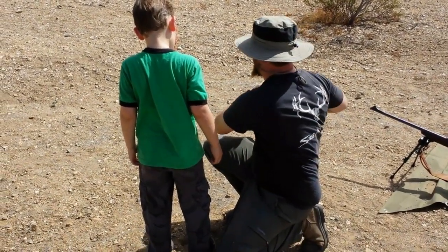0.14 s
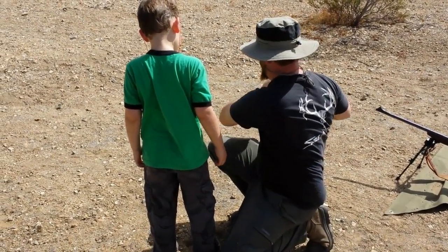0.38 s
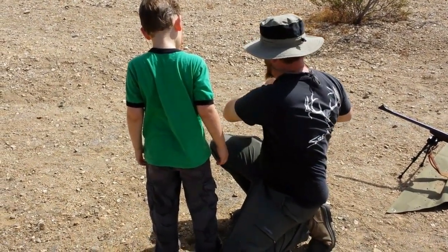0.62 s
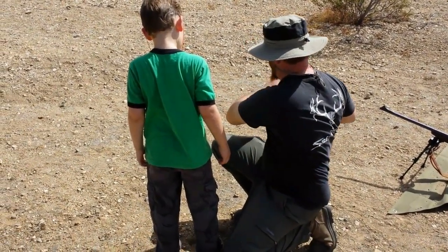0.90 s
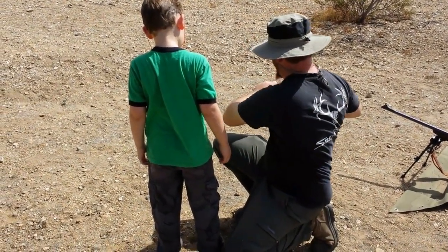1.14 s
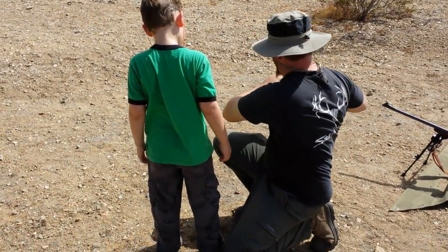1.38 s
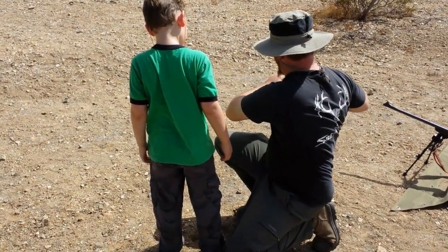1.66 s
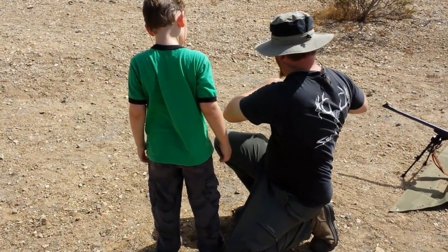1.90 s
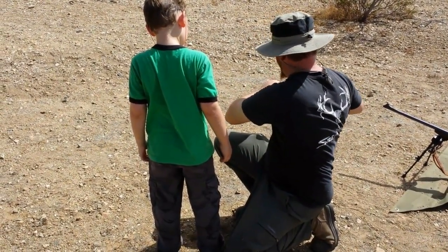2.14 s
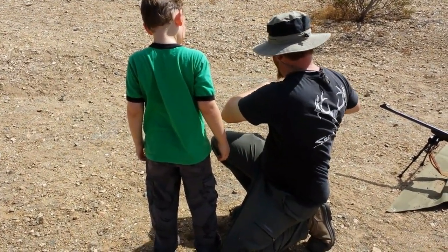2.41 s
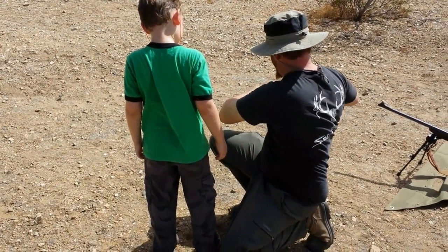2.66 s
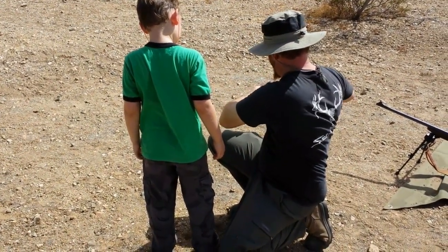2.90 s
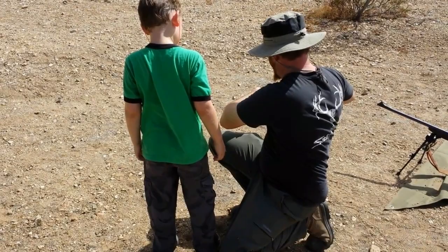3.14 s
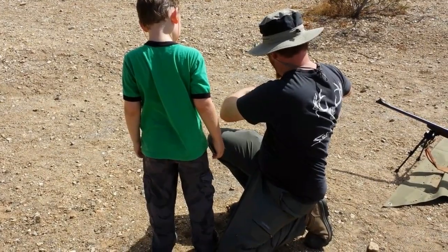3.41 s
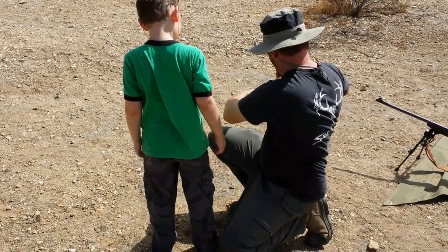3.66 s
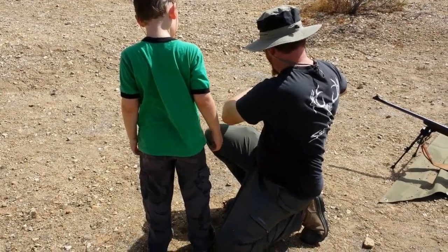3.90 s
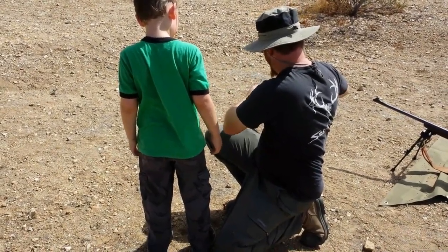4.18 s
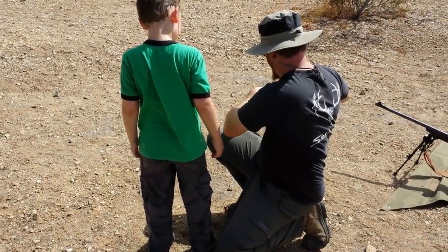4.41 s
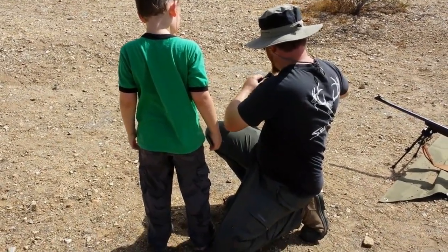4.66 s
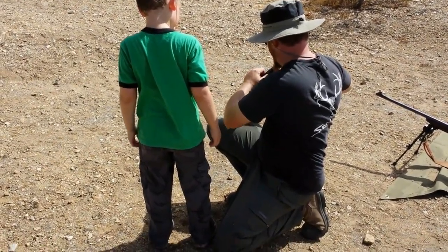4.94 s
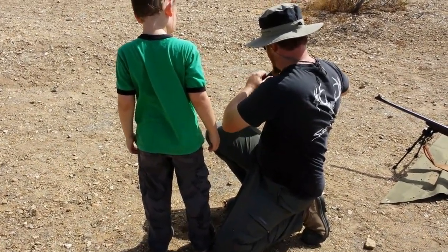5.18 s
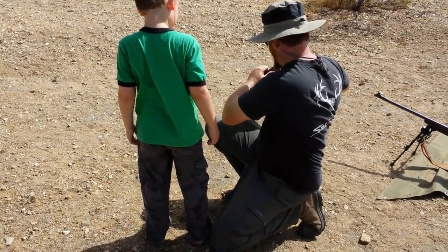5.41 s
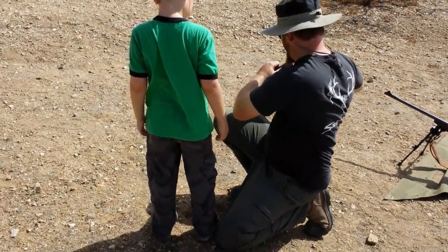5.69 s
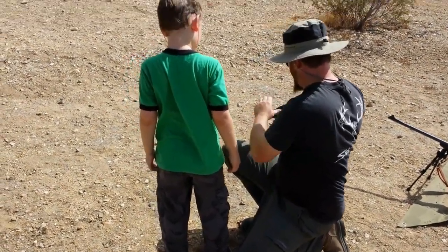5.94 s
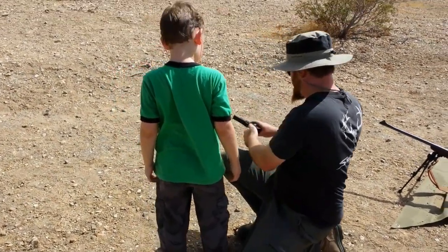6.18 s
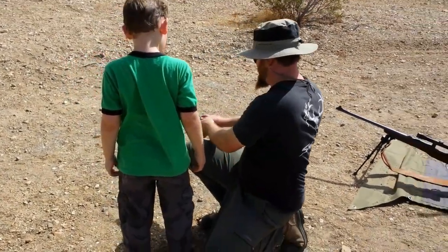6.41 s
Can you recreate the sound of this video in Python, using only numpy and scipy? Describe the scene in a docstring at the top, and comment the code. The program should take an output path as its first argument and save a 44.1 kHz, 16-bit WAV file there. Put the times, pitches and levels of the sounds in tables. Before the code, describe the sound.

Cartridges are pushed one by one into a small steel magazine with sharp metallic clicks while gusty wind thumps the microphone outdoors.

```python
"""Loading a steel magazine in gusty wind

Cartridges are thumbed into a small steel magazine a couple of metres from a handheld stereo camera, outdoors.
Each push is a cluster of short metal rattles: grainy noise excites damped steel modes and a dry crack.
Near the end shaped noise makes cloth brush and shuffle, and short filtered bursts make thin dry snaps.
Gusty wind buffets the two microphone ports separately, as low noise and swinging thumps,
and hisses round the camera body, whose hollows are resonators driven by the hiss."""
import sys
import numpy as np
from scipy import signal
from scipy.fft import rfft, irfft, next_fast_len
from scipy.io import wavfile
from scipy.ndimage import uniform_filter1d

SR = 44100
rng = np.random.default_rng(int(sys.argv[2]) if len(sys.argv) > 2 else 0)


def output_pcm(signal):
    """Save a mono or channel-first signal as 16-bit PCM at the path in sys.argv[1].

    Samples are clipped to [-1, 1] before scaling.
    """
    pcm = np.clip(np.atleast_2d(signal).T, -1, 1) * 32767
    wavfile.write(sys.argv[1], SR, np.round(pcm).astype(np.int16))


def gain_from_decibels(decibels):
    """Convert decibel values to linear amplitude factors."""
    exponent = np.asarray(decibels, float) / 20
    return 10 ** exponent


N = 289321  # length in samples


def colour(shape, size):
    """Spectral envelope: (Hz, value) points interpolated over log frequency onto transform bins."""
    hz, value = np.transpose(shape)
    bin_hz = np.arange(size // 2 + 1) * SR / size
    return np.interp(np.log(bin_hz + 1), np.log(hz + 1), value)


def curve(table):
    """Time envelopes: the columns of a table interpolated linearly over its times."""
    s, *columns = np.transpose(table)
    t = np.arange(N) / SR
    return [np.interp(t, s, c, left=-120, right=-120) for c in columns]


def noise(shape):
    """Spectral shaping: two independent white noises take the colour of (Hz, dB) points, at rms 1."""
    size = next_fast_len(N)
    spectrum = rfft(rng.standard_normal((2, size))) * gain_from_decibels(colour(shape, size))
    x = irfft(spectrum, size)[:, :N]
    return x / np.sqrt(np.mean(x ** 2))


def walk(rate):
    """Band-limited modulation: two random wanders of spread 1, made from steps at rate (Hz)."""
    k = int(SR / rate)
    steps = np.repeat(rng.standard_normal((2, N // k + 1)), k, axis=1)[:, :N]
    smooth = uniform_filter1d(uniform_filter1d(steps, k), k)
    return smooth / smooth.std()


def add(out, x, s):
    """Superposition: mix x into out from time s."""
    i = max(int(s * SR), 0)
    n = min(x.shape[-1], N - i)
    out[..., i:i + n] += x[..., :n]


def heard(x, alike):
    """Partial coherence: the ports share part of a nearby noise, with correlation alike."""
    return np.array([x[0], alike * x[0] + np.sqrt(1 - alike ** 2) * x[1]])


def bandpass(x, order, low_hz, high_hz):
    """Band limitation by a Butterworth filter."""
    return signal.sosfilt(signal.butter(order, [low_hz, high_hz], "bandpass", fs=SR, output="sos"), x)


# wind on the ports: start_s, strength_db, side_db (left minus right)
GUST_STRENGTH = [(0, -23.5, 18.5), (0.28, -30, -0.5), (0.52, -16, 19), (0.66, -33.5, -0.5),
                 (1.0, -28.5, -1.5), (1.25, -31.5, -3), (1.55, -40, 0.5), (1.73, -28, 20), (2.0, -28, 23),
                 (2.1, -27.5, 9), (2.3, -27, -4.5), (2.56, -30.5, -8.5), (2.75, -33, 12), (2.92, -11.5, 20),
                 (3.05, -28.5, 18), (3.33, -26, 14.5), (3.44, -41, 5.5), (3.55, -28, 14), (4.2, -25, 8.5),
                 (4.5, -26, 9), (4.82, -21, -5), (5.02, -36.5, -6.5), (5.45, -32.5, 2), (5.9, -27, 13),
                 (6.2, -18.5, 12.5), (6.38, -23.5, 1.5), (6.56, -17.5, 8)]


def gusts():
    """Power sharing: the wind strength divides between the ports by the side it blows from."""
    strength_db, side_db = curve(GUST_STRENGTH)
    return strength_db - 10 * np.log10(1 + gain_from_decibels(2 * np.array([-side_db, side_db])))


def eddies(gust_db):
    """Random eddy shedding: (s, dB, Hz, port) rows whose size and pitch follow the wind at each port."""
    rows, per_s = [], 14
    count = int(per_s * N / SR)
    for port in range(2):
        when = rng.uniform(0, 1, count)
        size, pitch = rng.standard_normal((2, count))
        s = (np.arange(count) + when) / per_s
        local_db = gust_db[port, (s * SR).astype(int)]
        db = np.minimum(local_db + 0.5 + 3.5 * size, -23.5)
        # centred on 108 Hz for an eddy of -27 dB, rising 1.5 Hz per dB
        hz = np.maximum(108 + 1.5 * (db + 27) + 19.4 * pitch, 60)
        rows += [(a, b, c, port) for a, b, c in zip(s, db, hz)]
    return rows


# single eddies placed in time, strong and moderate:
# centre_s, level_db (nominal), pitch_hz, port (0 left, 1 right)
PLACED_EDDIES = [(0.033, -12.5, 114, 0), (0.122, -17, 110, 0), (0.226, -20, 94, 0), (0.314, -18.5, 107, 0),
                 (0.362, -17, 105, 0), (0.4, -11.5, 125, 0), (0.514, -9, 143, 0), (0.962, -19.5, 112, 1),
                 (1.178, -24.5, 100, 1), (1.728, -20.5, 135, 0), (1.747, -16.5, 123, 0),
                 (1.81, -22, 121, 0), (2.084, -11, 103, 0), (2.309, -23, 115, 1), (2.485, -24, 101, 1),
                 (2.634, -23.5, 121, 0), (2.733, -24.5, 94, 0), (2.784, -17, 120, 0), (2.866, -13, 119, 0),
                 (2.923, -6, 118, 0), (2.974, -20, 123, 1), (2.998, -17.5, 124, 0), (3.039, -22, 108, 0),
                 (3.143, -18.5, 99, 0), (3.304, -20.5, 137, 0), (3.517, -25.5, 144.6, 0),
                 (3.647, -23, 97, 0), (3.676, -18.5, 104.4, 0), (3.864, -20.5, 100, 0),
                 (3.941, -25.5, 109, 0), (4.154, -20.5, 117, 0), (4.191, -19, 114, 0), (4.251, -16, 125, 0),
                 (4.273, -30, 108, 0), (4.44, -20, 129, 0), (4.622, -22.5, 123, 0), (4.673, -24, 105, 1),
                 (4.678, -27, 108, 0), (4.873, -16, 116.3, 0), (5.217, -27.5, 110, 1),
                 (5.491, -24.5, 112, 0), (5.826, -19.5, 130, 0), (6.092, -17.5, 137, 0),
                 (6.145, -15.5, 170, 0), (6.214, -8, 144, 0), (6.244, -19, 121, 0), (6.353, -15.5, 134, 0),
                 (6.436, -13.5, 141, 0), (6.491, -10, 127, 0), (6.492, -19, 127, 1), (6.513, -13, 145, 1),
                 (6.522, -11.5, 172, 0), (6.551, -18, 139, 1)]
# colour of the steady turbulence: frequency_hz, density_db (relative)
RUMBLE_COLOUR = [(20, -4), (45, 7), (85, 8), (130, -1), (180, -9.5), (250, -16.5), (330, -23), (450, -35),
                 (620, -53), (1200, -55.5)]
# colour of the part that grows faster with the wind: frequency_hz, density_db (relative)
EDDY_COLOUR = [(60, -15), (130, 1), (180, 2), (250, -8), (330, -15), (450, -44.5), (620, -58.5),
               (1200, -69)]


def wind(flutter_db=5.5, under_db=-8.5, cycles=0.86, brighten=0.42):
    """Turbulent pressure: rumble flutters on each port by itself; eddies thump for a cycle or two."""
    gust_db = gusts() + 3 * walk(9)  # the air arrives in lumps
    out = noise(RUMBLE_COLOUR) * gain_from_decibels(gust_db + under_db + 2.5 * walk(30))
    # faster air sheds smaller eddies, so the upper rumble grows quicker than the rest
    upper_db = gust_db - 16.5 + brighten * (gust_db + 19) + flutter_db * walk(45)
    out = out + noise(EDDY_COLOUR) * gain_from_decibels(upper_db)
    t = np.arange(-1500, 1500) / SR
    for s, peak_db, hz, port in list(PLACED_EDDIES) + eddies(gust_db):
        turn = rng.uniform(0, 2 * np.pi)
        cycle = 2 * np.pi * hz * t
        # the swing speeds up and slows within each cycle, which brings in overtones
        swing = np.sin(cycle + turn + 0.44 * np.sin(cycle))
        # stronger eddies are relatively rougher
        rough = bandpass(rng.standard_normal(len(t)), 4, 120, 420)
        swing = swing + gain_from_decibels(1.5 + 0.49 * peak_db) * rough
        thump = swing * np.exp(-(t * hz / cycles) ** 2)
        add(out[round(port)], gain_from_decibels(peak_db - 1.5) * thump, s + t[0])
    return out


# colour of flat hiss, of the wind and of the microphones: frequency_hz, density_db (relative)
HISS_COLOUR = [(300, 2), (650, -6), (1100, -7.5), (2100, -9), (3000, -10.5), (9300, -11.5), (14000, -15.5),
               (15500, -42)]
# course of the wind hiss: start_s, level_db (nominal), hollow_db (drive of the hollows over flat hiss)
HISS_COURSE = [(0.0, -63, -10), (.3, -59.5, -9), (0.8, -58, -5), (1.06, -63, -13), (1.28, -62, -13),
               (1.41, -69, -10), (1.68, -71, -10), (1.8, -60.5, -7), (2.52, -61, -11), (2.83, -64, -14),
               (2.98, -57.5, -5), (3.36, -64.5, -17), (3.62, -72, -5), (3.76, -64, -3), (3.9, -63.5, -16),
               (4.4, -61, -15.5), (5.39, -62, -13), (5.79, -51, -14), (6.12, -58.5, -6), (6.56, -59, -19)]
# hollows of the camera body: pitch_hz, width_hz, level_db (added to hollow_db)
HOLLOWS = [(2450, 250, 10), (4750, 350, 10), (7450, 400, 5)]


def stream():
    """Flow noise and cavity resonance: faint hiss follows the breeze and sounds the body's hollows."""
    raw = heard(noise(HISS_COLOUR), 0.17)
    level_db, hollow_db = curve(HISS_COURSE)
    out = raw
    for hz, width, db in HOLLOWS:
        resonance = signal.lfilter(*signal.iirpeak(hz, hz / width, SR), raw)
        out = out + gain_from_decibels(db + hollow_db + 2.0 * walk(13)[0]) * resonance
    return out / raw.std() * gain_from_decibels(level_db + 1.5 * walk(28)[0])


# contacts of steel on steel: start_s, level_db (nominal peak), length_ms (nominal),
# treble_db (nominal, over the mid), low_db (nominal, over the mid)
CONTACTS = [(0.105, -34.5, 6, -1, -9), (0.1376, -32, 3.5, -2, -6), (0.1457, -23, 1.5, -4, -4.5),
            (0.1599, -31.5, 1.4, 1, -4), (0.1767, -40.5, 5.5, -5, -3), (0.2853, -44.5, 2.7, -26, -3),
            (0.794, -36.5, 2.9, -5, -9), (0.8139, -30.5, 12.6, 3, -6), (0.8237, -32, 8.3, 0.5, -2.5),
            (0.8736, -44.5, 5.9, -4, -11), (0.8975, -19, 7.3, -1, -11), (0.922, -35.5, 3.2, 3, -19),
            (0.9325, -24.5, 7.5, 2, -2), (1.287, -47.5, 4, -8, -7), (1.306, -37, 15, 3, -8),
            (1.3466, -16.5, 1.86, 2, -2.5), (1.3768, -32.5, 4.6, 2, -1.5), (1.8417, -41.5, 7.4, -6, -7),
            (1.8626, -27, 1.6, -3, -3), (1.873, -15, 6.5, 7, -11), (1.8776, -10.5, 6.2, -1.5, -18),
            (1.8933, -17.5, 8, -1, -15), (1.898, -26, 5.1, 2, -9), (2.1023, -30, 4.6, 2, -4.5),
            (2.1142, -27, 2.7, -4, -9), (2.1225, -16.5, 2, 0, -8), (2.1277, -11, 6.9, -4.5, -16.5),
            (2.1483, -17.5, 5.9, -3.5, -17), (2.1762, -28.5, 5.5, -2, -14), (2.4207, -30.5, 3.9, -8, -12),
            (2.4358, -32, 4.1, 13, 3), (2.45, -3.5, 2, 1, -18), (2.4619, -9, 8.2, 1, -9.5),
            (2.812, -39.5, 2.4, -6.5, -13), (2.8168, -40.5, 8.2, -6, -24), (2.846, -18.5, 1.9, -1.5, -12),
            (2.86, -15.5, 3.1, 1, -5.5), (2.8787, -16.5, 3.4, 2.5, -14), (2.883, -25.5, 1.9, 2, -0.5),
            (2.9283, -36.5, 4.9, -1, -6), (2.944, -35, 6.7, 0, -8), (3.237, -40.5, 5.7, -0.5, -4),
            (3.256, -22, 4, -8, -10), (3.2662, -11, 1.4, 15, -9), (3.2729, -4.5, 3.1, -2, -20),
            (3.2843, -12, 6.4, -23, -19), (3.2918, -15, 3.1, 10, -7.5), (4.1628, -37.5, 5.1, 2, -4),
            (4.174, -33.5, 6.3, -4, -16), (4.188, -29, 6.7, -9, -21), (4.1937, -21.5, 4.7, -5.5, -6),
            (4.2046, -13, 4.4, -3.5, -11.5), (4.226, -21.5, 7.1, 1.5, -8), (4.2501, -31.5, 6.9, -1.5, -10),
            (4.462, -47, 33, -2, -5), (4.4898, -26, 3.8, -2, -9.5), (4.5012, -28, 7, 0.5, -11),
            (4.589, -33.5, 4.9, -2, -13), (4.601, -47, 4.5, -11.5, -1), (4.6258, -22.5, 4.8, -0.5, -12.5),
            (4.6547, -22.5, 9.2, 1, -8.5), (5.009, -39.5, 6, -4, -5.5), (5.05, -39, 3.7, 8, -17),
            (5.057, -36, 3.2, -2, -12), (5.076, -48, 26, -3, -14), (5.0973, -21.5, 6.6, -0.5, -12),
            (5.1159, -30, 7.5, -2, -12), (5.123, -27.5, 10, 3, -33), (5.255, -46, 9.9, -5, -2),
            (5.659, -45, 4.3, -7, -9), (5.6841, -24, 4.2, -0.5, -2.5), (5.6946, -26, 19, 5.5, -19),
            (5.726, -38, 6.5, -2, -15), (5.7713, -19, 6.3, 2.5, -12.5)]
# modes of the magazine: pitch_hz, width_hz (raised to 190 if narrower), level_db (mean, relative)
STEEL_MODES = [(920, 83, -56), (1350, 250, -21), (2250, 67, -11.5), (2214, 58, 11), (2440, 70, 9.5),
               (2582, 93, 17.5), (3930, 160, 6.5), (4530, 160, -7), (5100, 170, 6), (5740, 150, 0),
               (7040, 200, -27), (7240, 170, 7), (7520, 73, 12), (8150, 650, 4), (10100, 206, 1),
               (9900, 200, -26.5), (11800, 83, -11.5)]
# colour of the dry part of a blow: frequency_hz, level_db (relative)
CRACK_COLOUR = [(500, -114), (750, -2.5), (1000, 13.5), (1700, -4.5), (2400, -0.5), (3200, 6.5),
                (7500, -10), (9000, -7), (12000, -5), (13500, -28.5), (15000, -18)]
# level between the ports for the steel: frequency_hz, difference_db (left minus right)
PORT_LEVEL = [(500, -2), (1000, 5.5), (2200, -2), (4400, 4.5), (7500, -4), (11000, -13.5), (15000, -15)]
# phase between the ports for the steel: frequency_hz, lead_rad (left ahead of right)
PORT_LEAD = [(0, 6.3), (780, 6.9), (2670, 6.0), (3960, 10.3), (5080, 11.5), (6550, 12.6), (7580, 17.6),
             (10700, 20.0), (12800, 25.3), (15200, 32)]


def magazine(tail_ms=17, alike=0.64):
    """Modal excitation: each contact is a brief rattle that rings the steel modes over a dry crack."""
    out, t = np.zeros((2, N)), np.arange(3000) / SR
    size, lead = 4096, 256  # samples; the lead leaves room for the crack's symmetric response
    hz, width, db = (c[:, None] for c in np.transpose(STEEL_MODES))
    width = np.maximum(width, 190)  # the gripping hand damps the sharper modes
    ring_t = t[:1000]
    fade = np.sqrt(width) * gain_from_decibels(db) * np.exp(-np.pi * width * ring_t)
    crack = gain_from_decibels(colour(CRACK_COLOUR, size))
    for s, peak_db, ms, treble_db, low_db in CONTACTS:
        # grip and fill shift the modes a little; the place of the blow sets their mix
        mix, shift = rng.standard_normal((2, len(hz), 1))
        modes = gain_from_decibels(5 * mix) * fade * np.sin(2 * np.pi * hz * (1 + 0.035 * shift) * ring_t)
        ring = rfft(np.sum(modes, 0), size)
        ring = ring / np.linalg.norm(ring) + gain_from_decibels(-1) * crack / np.linalg.norm(crack)
        tilt = [(1300, low_db + 1.0), (1700, 0.011), (3200, 0.008), (5500, treble_db + 5.0)]
        ring = ring * gain_from_decibels(colour(tilt, size))
        ring = ring * np.sqrt(len(ring)) / np.linalg.norm(ring)
        # contact builds fast and stops short; a softer scrape follows as the parts settle
        blow = np.exp(-(1000 * t / (0.7 * ms)) ** 2)
        rise = 1 - np.exp(-(1000 * t / (0.55 * ms)) ** 2)
        scrape_db = -13 - 0.19 * (peak_db + 23.5)  # harder contacts leave relatively less scrape
        scrape = gain_from_decibels(scrape_db) * np.exp(-(1000 * t / tail_ms) ** 1.63)
        push = rise * (blow + scrape)
        # many tiny impacts of uneven strength rather than smooth hiss
        uneven = gain_from_decibels(4.35 * rng.standard_normal(len(t)) - 4.5)
        grit = rng.standard_normal((2, len(t))) * uneven
        rattle = np.pad(heard(grit * push, alike), ((0, 0), (lead, 0)))
        sound = irfft(rfft(rattle, size) * ring, size)
        add(out, gain_from_decibels(peak_db + 3.5) * sound, s - lead / SR - 0.001)
    size = next_fast_len(N)
    half = gain_from_decibels(colour(PORT_LEVEL, size) / 2)
    lag = np.exp(-1j * colour(PORT_LEAD, size))
    return irfft(rfft(out, size) * [half, lag / half], size)[:, :N]


def strokes(table):
    """Amplitude envelope: each stroke swells to a rounded crest and stops rather short."""
    t, out = np.arange(N) / SR, np.zeros(N)
    for s, db, swell, fade in table:
        before = ((s - t).clip(0) / swell) ** 2.3
        after = ((t - s).clip(0) / fade) ** 2.1
        out += gain_from_decibels(db) * np.exp(-np.where(t < s, before, after))
    return out


# colours of brushing and of shuffling cloth: frequency_hz, density_db (relative)
BRIGHT_COLOUR = [(500, -44), (1400, -7), (3100, -3), (8700, -0.5), (12000, -6.5), (15000, -13)]
DULL_COLOUR = [(300, -8), (550, 0), (1000, -1), (1600, -6), (2600, -16), (4000, -40)]
# strokes of each kind: crest_s, level_db (nominal crest), swell_s, fade_s
BRUSH_STROKES = [(5.57, -51, 0.034, 0.0068), (5.7, -49, 0.098, .03), (5.85, -48, 0.084, 0.069),
                 (5.945, -37, 0.048, 0.018), (6.085, -45, 0.031, 0.023), (6.41, -71, 0.077, .03)]
SHUFFLE_STROKES = [(5.37, -55.5, 0.067, 0.057), (5.54, -52, 0.038, .015), (5.805, -40, 0.039, 0.015),
                   (5.93, -54.5, 0.085, 0.041), (6.085, -59, 0.069, 0.035), (6.2, -62, 0.073, 0.13),
                   (6.41, -58, 0.057, .03)]


def cloth():
    """Friction noise: a grainy bright brushing, nearer the left port, and a duller shuffle."""
    grain = gain_from_decibels(1.8 * walk(300)[0] + np.array([[2.5], [-2.5]]))  # left raised, right lowered
    bright = heard(noise(BRIGHT_COLOUR), 0.11) * strokes(BRUSH_STROKES) * grain
    dull = heard(noise(DULL_COLOUR), 0.47) * strokes(SHUFFLE_STROKES) * gain_from_decibels(2.8 * walk(120)[0])
    return bright + dull


# thin dry snaps, too light to ring the steel:
# start_s, level_db (before filtering), decay_ms (time constant), low_hz, high_hz
DRY_SNAPS = [(5.3761, -25.5, 0.33, 500, 16000), (5.841, -28, 0.74, 4000, 13000), (6.01, -42, .8, 800, 8000),
             (6.126, -31, 1.5, 700, 3000), (6.1755, -34.5, 1.2, 700, 14900), (6.245, -33, 1.2, 500, 3180),
             (6.35, -35, 1.3, 600, 3000), (6.39, -41, 1.2, 500, 6040)]


def snaps():
    """Impulsive excitation: each snap is band-limited noise that decays exponentially within milliseconds."""
    out, t = np.zeros((2, N)), np.arange(400) / SR
    for s, db, ms, low_hz, high_hz in DRY_SNAPS:
        burst = heard(rng.standard_normal((2, len(t))), 0.28) * np.exp(-1000 * t / ms)
        add(out, gain_from_decibels(db) * bandpass(burst, 2, low_hz, high_hz), s)
    return out


def scene():
    """Linear superposition of wind, steel and cloth."""
    return wind() + stream() + magazine() + cloth() + snaps()


def low_pass(x):
    """Removes everything above the highest recorded frequency."""
    return signal.sosfilt(signal.butter(12, 15600, fs=SR, output="sos"), x)


def record(dry):
    """Self-noise and band limitation: each microphone adds its own hiss; lowest bass and top are cut."""
    x = dry + gain_from_decibels(-62) * noise(HISS_COLOUR)
    x = signal.sosfilt(signal.butter(2, 42, "highpass", fs=SR, output="sos"), x)
    x = signal.sosfilt(signal.ellip(10, 0.3, 40, 14650, fs=SR, output="sos"), x)
    return low_pass(x)


dry = scene()
out = record(dry)
output_pcm(out)
```